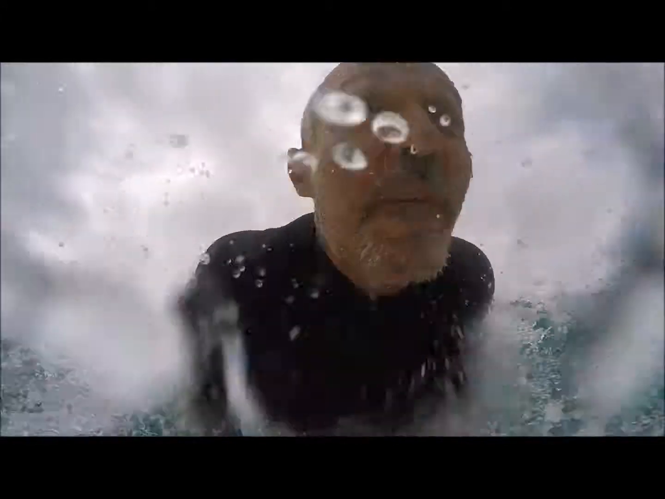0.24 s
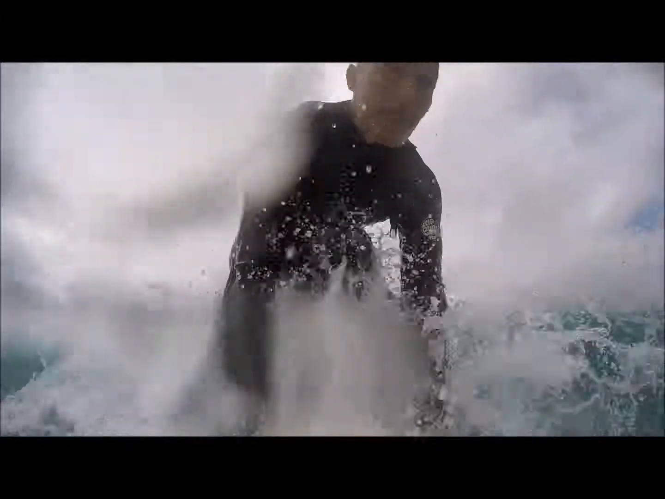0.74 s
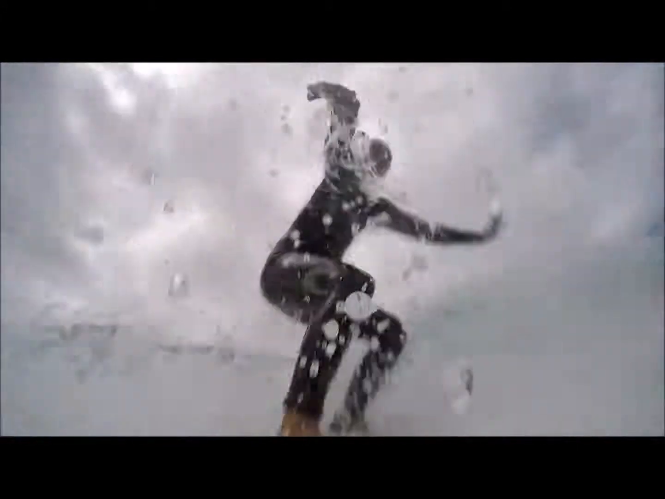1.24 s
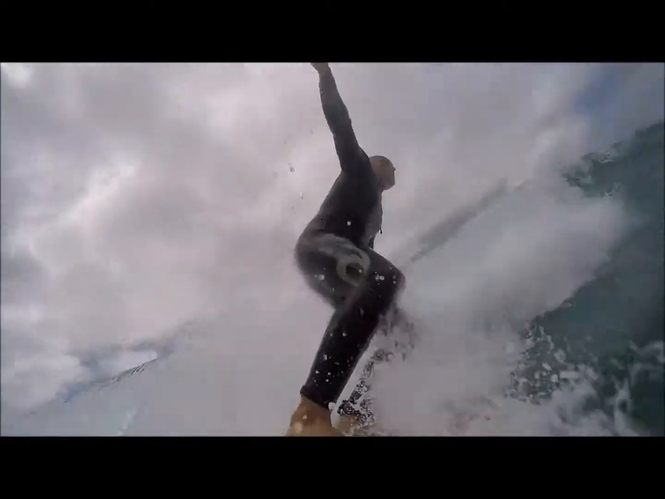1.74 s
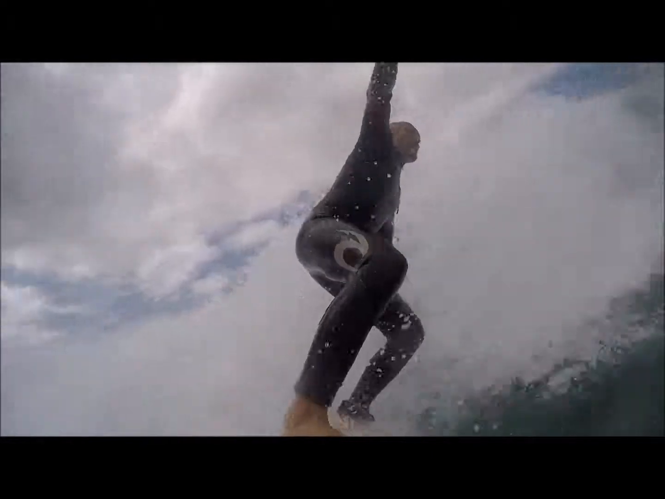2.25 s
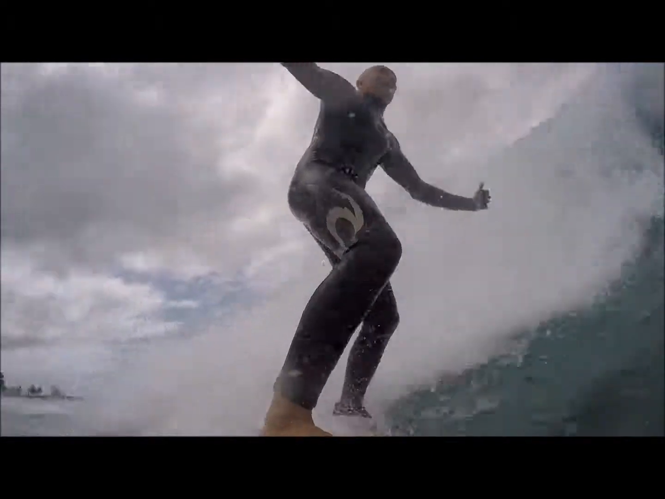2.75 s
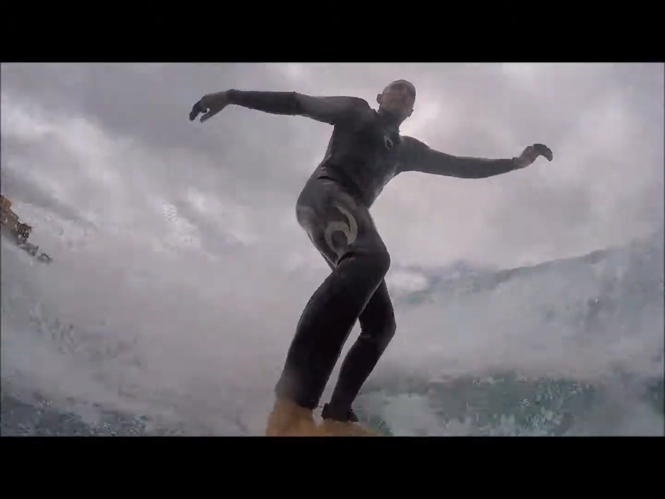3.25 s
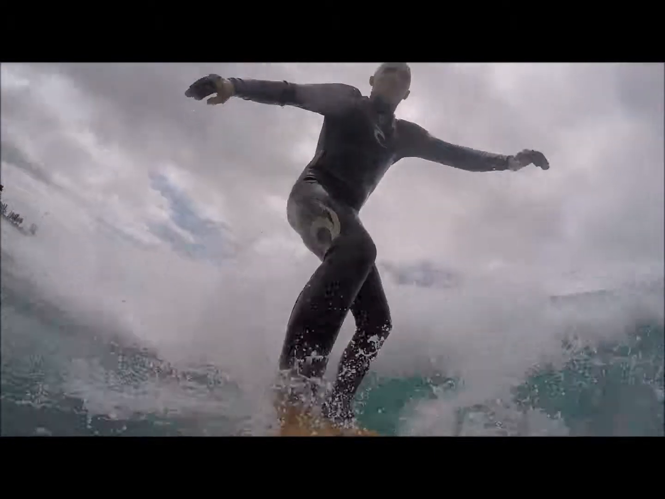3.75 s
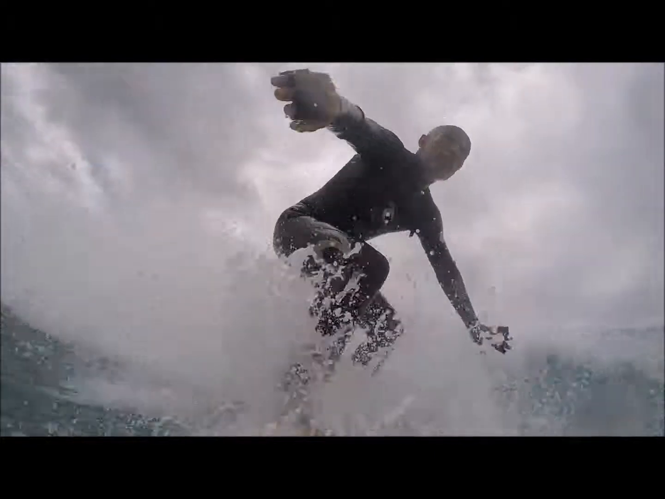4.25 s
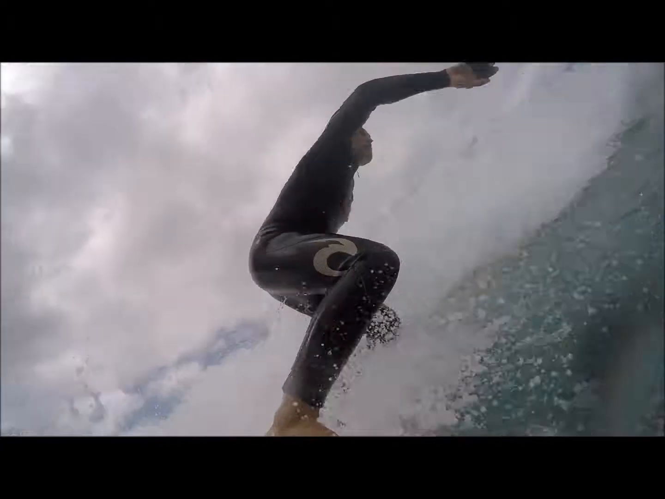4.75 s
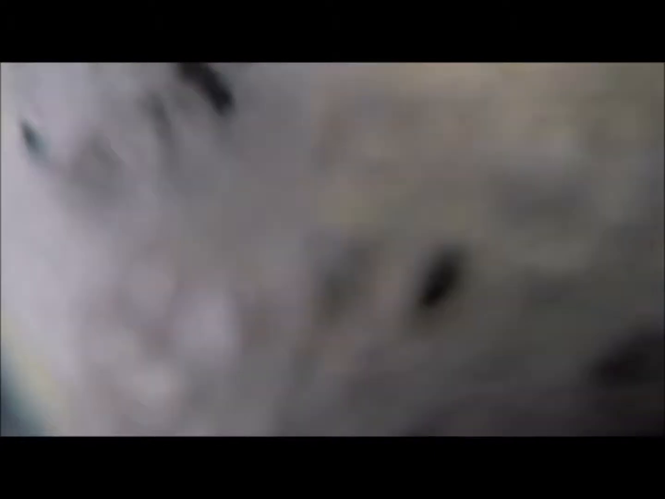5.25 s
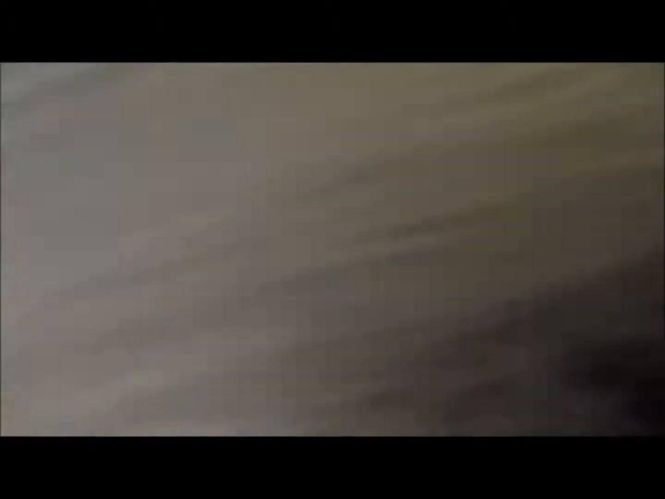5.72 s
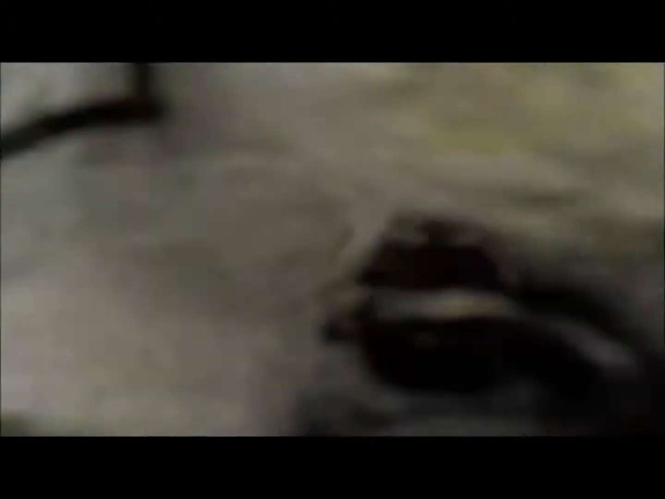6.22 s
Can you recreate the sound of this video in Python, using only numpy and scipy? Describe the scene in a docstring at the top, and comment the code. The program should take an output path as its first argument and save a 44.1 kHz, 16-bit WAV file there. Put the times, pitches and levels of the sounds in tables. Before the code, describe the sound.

A surfboard flaps, thuds and slaps through rushing foam, then its nose dives and the sound turns to muffled underwater churning and crackling bubbles.

```python
"""On the nose of a surfboard in a breaking wave: one microphone in a waterproof housing fixed to the board.
In air the board flaps in a low bending mode and booms on landings; filtered noise and bubbles make the
wash, foam and mist, noise bursts the slaps, gulps and spray, gliding tones the hand's squeak and the chirps.
Then the nose digs in: surges of ringing bubbles and noise churn, crackle and rumble at the case, air pockets
ring against it, and a thin simmer of distant foam fills the lull between."""
import sys
import numpy as np
from scipy import signal
from scipy.fft import rfft, irfft, next_fast_len
from scipy.io import wavfile

SR = 44100
rng = np.random.default_rng(int(sys.argv[2]) if len(sys.argv) > 2 else 0)


def materialize(psi):
    """Save the field psi as 16-bit PCM at rate SR to the path in sys.argv[1].

    A 1-D psi becomes a single channel; in a 2-D psi each row is a channel.
    """
    bounded = np.clip(np.atleast_2d(psi).T, -1, 1)
    quanta = np.round(bounded * 32767).astype(np.int16)
    wavfile.write(sys.argv[1], SR, quanta)


N = 285732
TIME = np.arange(N) / SR

# Bending of the board while it planes: (time [s], level before BEND_DB [dB])
SHUDDER = [(0.0, -14), (0.05, -10.5), (0.13, -33), (0.17, -8), (0.27, -9.5), (0.31, -21), (0.38, -8.5),
           (0.55, -21.5), (0.58, -10), (0.64, -9.5), (0.67, -26.5), (0.91, -6.5), (0.95, -17.5),
           (1.21, -12.5), (1.33, -31), (1.61, -11.5), (1.95, -13), (1.98, -18), (2.27, -12), (2.38, -27),
           (2.43, -12), (2.74, -16), (2.8, -26), (2.95, -10), (2.97, -21), (3.04, -8.5), (3.13, -20.5),
           (3.19, -6.5), (3.34, -31), (3.52, -33), (3.58, -4.5), (3.91, -56), (3.94, -33), (4.04, -6.5),
           (4.13, -11), (4.2, -27), (4.45, -20.5), (4.52, -9.5), (4.56, -24), (4.71, -11.5), (4.8, -36),
           (4.83, -30)]
# Air buffeting the housing: (frequency [Hz], relative density [dB per Hz])
BUFFET = [(18, -1.5), (40, 12), (70, -25)]
BEND_HZ, BEND_SUBMERGED_HZ = 39.08, 58.8   # mean pitch in air, under water
BEND_DB, BEND_SUBMERGED_DB = 1, 4.5   # over its curve; over the heave of the white water
BEND_TOP_HZ = 73.5   # the soft board passes little above this
BEAT_DB = 3.5   # unevenness of the flapping
SHUDDER_FLOOR_DB = -39   # the board never lies quite still while it planes


def board():
    """The nose flaps in one beating bending mode, higher under water; moving air buffets the housing."""
    (level_db,) = in_time(SHUDDER)
    under = submerged()
    hz = BEND_HZ + (BEND_SUBMERGED_HZ - BEND_HZ) * under
    phase = 2 * np.pi * np.cumsum(hz * (1 + 0.0864 * drift(15.9))) / SR
    beating = rms_one(from_db(BEAT_DB * drift(9.3)))
    flap = lowpass(beating * np.sqrt(2) * np.sin(phase), 3, BEND_TOP_HZ)
    buffet = from_db(-6.5) * colour(rng.standard_normal(N), BUFFET)
    planing = together([from_db(level_db + BEND_DB), from_db(SHUDDER_FLOOR_DB)])
    pushed = from_db(BEND_SUBMERGED_DB) * heave()
    return ((1 - under) * planing + under * pushed) * (flap + buffet)


# The hull taking the weight of a landing:
# (time [s], starting level [dB], frequency [Hz], time to fade by 60 dB [s])
THUDS = [(0.132, -21, 277, 0.028), (0.875, -9, 149, 0.025), (0.9, -13, 67, 0.13), (1.103, -5, 110, 0.015),
         (3.178, 3, 85, 0.02), (3.212, -1.5, 58.3, 0.096), (3.571, -4.5, 62, 0.2), (4.066, 1, 70, 0.027),
         (4.891, 0, 32, 0.16), (4.928, -2, 124, 0.027), (4.971, 6.5, 97, 0.033), (6.171, 1, 92, 0.034)]
THUD_RISE_CYCLES = 0.027   # the water cushions the blow


def thuds():
    """A hard landing sets the foam-cored hull booming for a few cycles."""
    out = np.zeros(N)
    for s, db, hz, t60 in THUDS:
        age = np.clip(TIME - s, 0, 1)
        onset = np.tanh(age * hz / THUD_RISE_CYCLES)
        out += from_db(db - 60 * age / t60) * onset * np.sin(2 * np.pi * hz * age)
    return out


# Steady planing, as wash under the hull: (time [s], level before WASH_DB or FOAM_DB [dB])
PLANING = [(0.0, -32), (0.44, -30), (1.45, -37), (1.77, -27), (2.18, -30), (2.43, -30.5), (3.05, -30.5),
           (3.3, -41.5), (3.86, -42.5), (4.53, -33.5), (4.6, -38.5), (4.83, -33.5)]
# The hull presses into the water: (time at the deepest [s], wash level [dB], foam level [dB], length [s])
DIPS = [(0.161, -24.5, -30, 0.18), (0.542, -23, -35, 0.2), (0.686, -23.5, -27.5, 0.055),
        (0.908, -17, -29, 0.1), (1.21, -26, -29, 0.58), (1.59, -29.5, -55, 0.76), (1.868, -30, -23.5, 0.21),
        (2.425, -19, -24, 0.35), (2.546, -14, -26, 0.18), (3.171, -17.5, -29, 0.084),
        (3.585, -16.5, -27, 0.1), (3.647, -23, -26.5, 0.1), (4.023, -16, -27, 0.09),
        (4.073, -15, -21, 0.066), (4.449, -23, -30, 0.16), (4.748, -27, -30.5, 0.24)]
# Spectra of wash and foam: (frequency [Hz], relative density [dB per Hz])
WASH = [(70, 7), (110, -10.5), (170, -8.5), (260, -3.5), (400, -4), (560, -2), (720, -3), (1000, -13.5),
        (1350, -32), (2000, -23)]
FOAM = [(800, -44), (1050, -0.5), (1300, 6), (1600, 4), (1850, 5.5), (2300, -3.5), (2750, -3.5),
        (3150, -12), (4000, -13.5), (5000, -47)]
WASH_DB, FOAM_DB = 1.5, -3.5   # over the planing level
DIP_RISE, DIP_FALL, DIP_DEPTH_DB = 0.53, 0.64, 16   # shares of its length to swell and ebb by this depth


def rush():
    """Planing water gurgles under the hull and breaks into foam; both swell when the hull presses in."""
    (planing_db,) = in_time(PLANING)
    washing, foaming = [from_db(planing_db + WASH_DB)], [from_db(planing_db + FOAM_DB)]
    for s, wash_db, foam_db, length in DIPS:
        depth = swell(s, s, DIP_DEPTH_DB / (DIP_RISE * length), DIP_DEPTH_DB / (DIP_FALL * length))
        washing.append(from_db(wash_db) * depth)
        foaming.append(from_db(foam_db) * depth)
    gurgle = bubbles(450, 220, 1600, cycles=14, spread_db=2.5)
    froth = bubbles(1200, 1000, 4500, cycles=20, spread_db=3)
    wash = water(WASH, gurgle, smooth_db=9, surge_db=1.4, surge_rate=25)
    foam = water(FOAM, froth, smooth_db=4, surge_db=1.3, surge_rate=27)
    return (1 - submerged()) * (together(washing) * wash + together(foaming) * foam)


# Fine mist thrown off the wave: (time [s], level before a lift of 1.5 dB [dB])
MIST_LEVEL = [(0.0, -39.5), (0.45, -45), (0.81, -49), (1.52, -49.5), (1.65, -46.5), (1.94, -43.5),
              (2.35, -41.5), (3.04, -45.5), (3.25, -53.5), (3.9, -55), (4.09, -48), (4.48, -54.5),
              (4.83, -47)]
# Spectra of mist, and of fizz and droplets: (frequency [Hz], relative density [dB per Hz])
MIST = [(3000, 8.5), (4300, 0), (4900, 0.5), (5650, 4), (6600, -7.5), (8100, -3.5), (9500, -16),
        (14000, -13.5), (16000, -33)]
FIZZ = [(2000, -80), (3000, -17), (3800, -3.5), (4700, -14.5), (6000, -11.5), (8000, -16.5), (11000, -22.5),
        (15000, -28)]
DROPLETS_PER_S, DROPLET_DB = 170, -17   # against the mist


def mist():
    """Dense fine grains of spray hiss over noise, with sparser droplets among them."""
    (level_db,) = in_time(MIST_LEVEL)
    fine = water(MIST, grains(6000, spread_db=4), smooth_db=2.5, surge_db=1.1, surge_rate=22)
    droplets = colour(grains(DROPLETS_PER_S, spread_db=5), FIZZ)
    return (1 - submerged()) * from_db(level_db + 1.5) * (fine + from_db(DROPLET_DB) * droplets)


FIZZ_DB, FIZZ_FOLLOWS = -2, 1.243   # bursting grows faster than the churn
CRACKLE_PER_S, CRACKLE_DB = 330, -21   # against the fizz


def tumble():
    """White water shakes the hull and churns round the sunken case; its bubbles burst on the wall."""
    force, bursts = turbulence(), grains(450, spread_db=3.5)
    fizz = water(FIZZ, bursts, smooth_db=0, surge_db=2.0, surge_rate=60)
    crackle = from_db(CRACKLE_DB) * colour(grains(CRACKLE_PER_S, spread_db=5.5), FIZZ)
    bursting = from_db(FIZZ_DB) * force ** FIZZ_FOLLOWS * (fizz + crackle)
    shaking = from_db(-9.5) * heave() * hull_rumble()
    return submerged() * (shaking + force * churn(bursts) + bursting)


# Hull modes under water: (frequency [Hz], width of each of two passes [Hz], level [dB])
HULL = [(102, 116, -0.5), (148, 26, -19), (240, 110, -18)]


def hull_rumble():
    """Eddies drive the low modes of the hull; unit power."""
    eddies, rumble = rng.standard_normal(N), np.zeros(N)
    for hz, width, db in HULL:
        mode = resonate(resonate(eddies, hz, width), hz, width)
        rumble += from_db(db) * rms_one(mode)
    return rms_one(rumble)


# Spectra of the churn and of larger bubbles popping: (frequency [Hz], relative density [dB per Hz])
CHURN = [(200, -2.5), (300, -2), (450, 2), (800, 1.5), (1150, -1.5), (1500, 1.5), (2100, 1), (2700, -2),
         (3600, -13.5), (5000, -7)]
POP = [(900, 3), (2200, 11), (3800, -3.5), (6000, -6), (12000, -15)]
CASE_RING_DB, GURGLE_DB = -13, -8   # against the boiling water
POPS_PER_S, POP_DB = 300, -4.5   # larger bubbles collapsing on the case


def churn(bursts):
    """Water boils with bubbles that ring, gurgle and collapse, and their bursts set the case ringing."""
    boil = bubbles(1000, 900, 4200, cycles=26, spread_db=2.5) + .8 * bursts
    boiling = water(CHURN, boil, smooth_db=8.0, surge_db=4.0, surge_rate=17.4)
    boiling = boiling + from_db(CASE_RING_DB) * case_ring(bursts)
    boiling = boiling + from_db(GURGLE_DB) * gurgles(950, 5000, spread_db=20)
    pops = colour(grains(POPS_PER_S, spread_db=4), POP)
    return from_db(-1) * boiling + from_db(POP_DB) * pops


# Modes of the case: (frequency [Hz], width [Hz], relative gain [dB])
CASE = [(1184, 11, 44), (1620, 170, 4), (1860, 120, 9), (2160, 89, -18), (2220, 56, 18), (2440, 120, 27),
        (2850, 110, -7), (3690, 100, 5), (3970, 30, 3), (5850, 30, 0), (8200, 25, -7)]


def case_ring(x):
    """The plastic case rings in its modes, alternating in sign; unit power."""
    ring = np.zeros(N)
    for k, (hz, width, db) in enumerate(CASE):
        ring += (-1) ** k * from_db(db) * resonate(x, hz, width)
    return rms_one(ring)


GURGLE_CYCLES, GURGLE_RISE = 7.9, 0.058   # cycles to fade by a neper; share its pitch rises meanwhile


def gurgles(low_hz, high_hz, spread_db, count=900):
    """Large bubbles pinch off one by one and ring, rising in pitch; unit power."""
    out, t = np.zeros(N + SR), TIME[:SR // 16]
    for when, size, strength in rng.random((count, 3)):
        at, hz = int(when * N), low_hz * (high_hz / low_hz) ** size
        age = t * hz / GURGLE_CYCLES
        ring = np.exp(-age) * np.sin(2 * np.pi * hz * t * (1 + GURGLE_RISE * age / 2))
        out[at:at + len(t)] += from_db(spread_db * strength ** 2) * ring
    return rms_one(out[:N])


# Surges of white water over the sunken nose:
# (time at full force [s], hold [s], churn force before pockets shield it [dB], heave [dB])
SURGES = [(4.891, 0.019, -15, -9), (4.98, 0.0045, -35, -47), (5.598, 0.055, -20, -14.5),
          (5.734, 0.006, -22.5, -17), (5.798, 0.15, -23.5, -21.5), (6.01, 0.16, -45, -24.5),
          (6.181, 0.21, -20, -20), (6.399, 0.08, -21.5, -18.5)]
HEAVE_RISE_DB_PER_S, HEAVE_FALL_DB_PER_S = 137, 219
LULL_DB, LULL_HEAVE_DB = -60, -46.5   # still water between surges: churn, heave


def heave():
    """Slow push of the white water on the hull."""
    pushes = [from_db(LULL_HEAVE_DB)]
    for s, hold, _, db in SURGES:
        pushes.append(from_db(db) * swell(s, s + hold, HEAVE_RISE_DB_PER_S, HEAVE_FALL_DB_PER_S))
    return together(pushes)


SURGE_RISE_DB_PER_S, CHURN_FALL_DB_PER_S = 453, 275
FIRST_EDDIES_DB, EDDIES_RISE_DB_PER_S = 0, 121   # against the surge they announce
SPUTTER_DB, SPUTTER_HZ = 6, 70   # the first eddies come in fits and starts


def turbulence():
    """Sputtering eddies announce each surge; it breaks, holds and drains; air pockets keep it off the case."""
    gains = [from_db(LULL_DB)]
    sputter = rms_one(from_db(SPUTTER_DB * np.tanh(drift(SPUTTER_HZ))))
    for s, hold, db, _ in SURGES:
        surge = swell(s, s + hold, SURGE_RISE_DB_PER_S, CHURN_FALL_DB_PER_S)
        eddies = sputter * swell(s, s, EDDIES_RISE_DB_PER_S, CHURN_FALL_DB_PER_S)
        gains.append(from_db(db) * surge)
        gains.append(from_db(db + FIRST_EDDIES_DB) * eddies)
    shield_db = sum(db * held(s, length) for s, length, db, _ in POCKETS)
    return together(gains) * from_db(-shield_db)


# Water slapping the hull: (time [s], level [dB], length [s], centre [Hz])
SLAPS = [(0.130, -11.5, 0.0085, 320), (0.868, -15, 0.02, 790), (1.105, -16, 0.016, 2470),
         (1.240, -22, 0.018, 1080), (2.243, -19, 0.0091, 1570), (2.528, -9.5, 0.0079, 1580),
         (2.564, -15, 0.0025, 1700), (3.165, -10.5, 0.028, 523), (3.173, -22, 0.03, 790),
         (3.287, -31, 0.012, 1430), (3.558, -22, 0.015, 580), (3.564, -11.5, 0.01, 694),
         (4.005, -15.5, 0.0044, 627), (4.070, -8, 0.0059, 560), (4.075, -35, 0.0046, 1390),
         (4.097, -21.5, 0.0068, 1360), (4.116, -16, 0.003, 450), (4.772, -22, 0.01, 1470),
         (4.885, -16.5, 0.005, 1270), (4.892, -9, 0.0084, 526), (4.900, -11, 0.007, 1790),
         (4.914, -8, 0.0017, 1760), (4.930, -21, 0.0092, 760), (4.969, -6, 0.0079, 288),
         (4.970, -5, 0.003, 1310), (5.545, -24, 0.0076, 900), (5.590, -32, 0.013, 620),
         (5.728, -32, 0.011, 1010), (6.173, -24, 0.0081, 720), (6.418, -23, 0.0044, 1110)]
# Gulps of air trapped under the board: (time [s], level [dB], length [s], centre [Hz])
GULPS = [(0.465, -23, 0.008, 690), (0.488, -27, 0.0071, 466), (0.497, -16.5, 0.011, 610),
         (0.580, -29, 0.037, 606), (0.652, -23.5, 0.0083, 420), (0.659, -27.5, 0.018, 730),
         (0.677, -29, 0.015, 694), (0.822, -25.5, 0.018, 1180), (0.876, -24.5, 0.0058, 1270),
         (0.935, -25.5, 0.037, 1300), (0.972, -22.5, 0.0041, 352), (1.199, -17.5, 0.0045, 1230),
         (1.228, -25, 0.013, 1250), (1.250, -19.5, 0.012, 740), (1.315, -26, 0.017, 815),
         (1.33, -18.5, 0.0054, 390)]
# Spray and drops striking the housing: (time [s], level [dB], length, at least 1 ms is played [s], centre [Hz])
SPRAY = [(0.299, -34, 0.002, 6500), (0.305, -20.5, 0.01, 1990), (0.307, -23.5, 0.011, 6100),
         (0.321, -27, 0.0039, 2200), (0.328, -27, 0.0053, 3000), (0.751, -27, 0.0073, 2600),
         (0.753, -31.5, 0.0041, 7800), (0.927, -27.5, 0.0023, 5040), (1.038, -30, 0.0047, 5660),
         (1.104, -16, 0.0076, 4000), (1.113, -20.5, 0.0059, 6440), (1.121, -31, 0.0062, 5500),
         (1.132, -32, 0.0094, 5000), (1.141, -35, 0.0038, 5000), (1.152, -32, 0.0051, 3300),
         (1.192, -33, 0.002, 2800), (1.214, -21, 0.0067, 2950), (1.222, -40, 0.016, 6500),
         (1.2415, -15, 0.0055, 2370), (1.242, -23, 0.004, 5660), (1.252, -14, 0.0026, 1980),
         (1.2525, -15.5, 0.0025, 4960), (1.312, -32, 0.0019, 2900), (2.308, -18, 0.00083, 5900),
         (2.316, -18.5, 0.0014, 4350), (2.530, -23.5, 0.0016, 5950), (2.700, -27, 0.0015, 11700),
         (2.924, -25, 0.00084, 4100), (3.176, -26.5, 0.0045, 2400), (3.190, -30.5, 0.0046, 6500),
         (3.581, -13, 0.0036, 1880), (3.582, -15.5, 0.00088, 3700), (3.583, -22, 0.001, 8200),
         (4.075, -32, 0.004, 2600), (4.107, -23, 0.00084, 10800), (4.118, -37, 0.004, 6500),
         (4.844, -28, 0.0076, 5500), (4.846, -21.5, 0.0044, 2680), (4.852, -26, 0.003, 4200),
         (4.876, -23, 0.0017, 3180), (4.941, -25, 0.0058, 4200), (4.969, -8.5, 0.0032, 3320),
         (5.351, -48, 0.0015, 7000), (5.404, -50, 0.0017, 4000), (5.462, -24.5, 0.0025, 2650),
         (5.469, -30, 0.0011, 9900), (5.496, -25.5, 0.0046, 2960), (5.514, -25, 0.0034, 3200),
         (5.525, -34, 0.002, 3200), (5.545, -27, 0.0024, 2250), (5.782, -11, 0.00094, 3930),
         (5.847, -14.5, 0.0058, 2680), (5.872, -15, 0.0032, 2870), (5.891, -25, 0.0046, 3600),
         (5.909, -17.5, 0.0032, 2380), (5.940, -28, 0.0033, 6450), (5.950, -16, 0.00073, 6600),
         (5.995, -14, 0.00091, 5370), (5.996, -17, 0.01, 2330), (6.149, -26, 0.0073, 2700),
         (6.174, -5.5, 0.0024, 2490), (6.311, -17.5, 0.0093, 2600), (6.331, -19, 0.003, 3500),
         (6.350, -21, 0.015, 3070)]
SPATTER_DB, SPATTER_HZ = 4, 160   # a splash breaks up into lumps


def splashes():
    """Dull slaps and gulps at the hull, and ragged spray on the housing."""
    heavy = lowpass(rng.standard_normal(N), 2, 2200)
    lumps = from_db(SPATTER_DB * np.tanh(drift(SPATTER_HZ)))
    slaps = impacts(SLAPS, heavy * lumps, width=0.37, tail_s=0.0068)
    gulps = impacts(GULPS, heavy, width=0.099, tail_s=0.0042)
    drops = rms_one(rng.standard_normal(N) + bubbles(9000, 1500, 14000, cycles=12, spread_db=2))
    spray = impacts(SPRAY, drops * lumps, width=0.62, tail_s=0.0096)
    return slaps + gulps + spray


CONTACT_DB, CONTACT_S = 6.5, 0.00056   # the first touch of a splash is its hardest


def impacts(rows, force, width, tail_s):
    """Water strikes, presses for its length, then runs off; each splash sounds round its own centre."""
    out, t = np.zeros(N + SR), TIME[:SR // 5]
    for s, db, length, hz in rows:
        at, length = int(s * SR), max(length, .001)
        run_off = from_db(-16) * np.exp(-t / (tail_s + length / 2))
        press = np.exp(-(t / length) ** 4) + run_off
        press = press * from_db(CONTACT_DB * np.exp(-t / CONTACT_S))
        breadth = width * min(length / 0.0065, 1)   # short splashes ring more purely than long ones
        burst = resonate(np.roll(force, -at)[:len(t)] * press, hz, hz * breadth)
        out[at:at + len(t)] += from_db(db) * burst / np.sqrt(np.sum(burst ** 2) / (length * SR))
    return out[:N]


# Single drops and bubbles ringing for an instant:
# (time [s], starting level [dB], frequency [Hz], time to fade by 60 dB [s])
PLINKS = [(0.312, -7.5, 6060, 0.014), (0.322, -19, 5760, 0.01), (0.332, -11.5, 1660, 0.018),
          (0.349, -10, 1800, 0.014), (0.349, -11, 2980, 0.011), (0.926, -17.5, 7000, 0.006),
          (1.039, -17, 7500, 0.008), (1.215, -12, 1940, 0.012), (2.308, -7, 6800, 0.0047),
          (2.316, -7, 5260, 0.0058), (2.333, -23, 4150, 0.018), (2.701, -17, 5130, 0.0065),
          (2.924, -12.5, 2540, 0.012), (3.199, -15, 2500, 0.012), (4.097, -19, 3850, 0.011),
          (4.108, -24, 3670, 0.01), (4.914, -7, 1940, 0.037), (5.768, -9, 2350, 0.012),
          (5.814, -9, 2350, 0.013), (5.834, -13, 2420, 0.012), (5.845, 1.5, 2250, 0.013),
          (6.28, -17, 1800, 0.04), (6.315, -10, 1660, 0.034)]


def plinks():
    """A drop traps a small bubble, which rings and dies within milliseconds."""
    out, t = np.zeros(N + SR), TIME[:SR // 16]
    for s, db, hz, t60 in PLINKS:
        at = int(s * SR)
        ring = np.tanh(t * hz) * np.sin(2 * np.pi * hz * t)
        out[at:at + len(t)] += from_db(db - 60 * t / t60) * ring
    return out[:N]


# Air pockets ringing against the case: (time [s], length [s], cut in the churn [dB],
# resonances as (frequency [Hz], width, widened by half for each of two passes [Hz], level [dB]))
POCKETS = [(5.806, 0.035, 6.8, [(2300, 450, -19.5), (3650, 200, -23.5), (4930, 130, -33)]),
           (5.923, 0.028, 12, [(2180, 400, -19.5), (2720, 150, -37), (3760, 110, -23)]),
           (6.037, 0.051, 15, [(1560, 490, -30.5)]), (6.09, 0.074, 14.4, [(1400, 490, -36.5),
           (3770, 51, -60), (5850, 50, -52)]), (6.281, 0.03, 3.6, [(1130, 32, -22.5), (1620, 66, -25),
           (1975, 48, -18.5), (2310, 260, -22.5), (5850, 43, -28.5), (8500, 40, -37)])]
POCKET_THROB_DB, POCKET_THROB_HZ, POCKET_WAVER = 5, 130, 0.018   # shaken by the churn; share its pitch wavers


def pockets():
    """Air caught on the case rings at pitches of its own, throbbing and wavering as it deforms."""
    out, samples = np.zeros(N), np.arange(N)
    deformed = samples + np.cumsum(POCKET_WAVER * drift(POCKET_THROB_HZ))
    for s, length, _, resonances in POCKETS:
        stay = held(s, length)
        throb = from_db(POCKET_THROB_DB * np.tanh(drift(POCKET_THROB_HZ)))
        for hz, width, db in resonances:
            ring = resonate(resonate(rng.standard_normal(N), hz, 1.5 * width), hz, 1.5 * width)
            ring = stay * throb * np.interp(deformed, samples, ring)
            out += from_db(db) * ring / np.sqrt(np.sum(ring ** 2) / np.sum(stay ** 2))
    return out


# Wet hand slipping on the deck: (time [s], mean frequency [Hz], mean level [dB])
SQUEAK = [(0.51, 680, -45), (0.522, 610, -22), (0.53, 520, -15), (0.54, 470, -15), (0.55, 495, -10.5),
          (0.561, 510, -8.5), (0.569, 560, -13), (0.577, 630, -40)]
SQUEAK_OCTAVE_DB = -23   # its overtone


def squeak():
    """Skin sticks and slips on the wet deck: an unsteady tone that sags and rises, with a weak overtone."""
    hz, level_db = in_time(SQUEAK)
    phase = 2 * np.pi * np.cumsum(hz * (1 + 0.04 * drift(154))) / SR
    sliding = (TIME > SQUEAK[0][0]) & (TIME < SQUEAK[-1][0])
    tone = np.sin(phase) + from_db(SQUEAK_OCTAVE_DB) * np.sin(2 * phase)
    return sliding * from_db(level_db + 1.4 * drift(120)) * np.sqrt(2) * tone


# Water films chirping as they drain:
# (time [s], length [s], start [Hz], end [Hz], level before the flutter [dB])
CHIRPS = [(2.859, 0.018, 4400, 5900, -27.5), (2.860, 0.016, 2900, 3500, -34),
          (5.148, 0.022, 4950, 5600, -53), (5.184, 0.016, 4000, 4200, -52), (5.218, 0.058, 3500, 2500, -46),
          (5.222, 0.06, 773, 600, -45), (5.262, 0.028, 2500, 4200, -42), (5.284, 0.016, 4200, 5900, -46),
          (6.035, 0.017, 10800, 9200, -40)]


def chirps():
    """A shrinking film of water whistles in a short, rough glide."""
    out, flutter, waver = np.zeros(N), drift(250), drift(500)
    for s, length, start_hz, end_hz, db in CHIRPS:
        along = np.clip((TIME - s) / length, 0, 1)
        hz = (start_hz + (end_hz - start_hz) * along) * (1 + .02 * waver)
        whistle = np.sqrt(2) * np.sin(2 * np.pi * np.cumsum(hz) / SR)
        out += from_db(db) * np.sin(np.pi * along) * (.8 + .55 * flutter) * whistle
    return out


# Distant foam heard through still water: (frequency [Hz], relative density [dB per Hz])
LULL = [(180, -33), (300, 1.5), (723, -6.5), (970, -10.5), (1560, 1), (4330, -14.5), (4750, -9),
        (5130, -20), (12000, -29), (15600, -54), (22000, -120)]
STILL_WATER_DB = -52.5


def lull():
    """A thin simmer of distant foam reaches the sunken case, bare between the surges."""
    return submerged() * from_db(STILL_WATER_DB) * colour(grains(3000, spread_db=3.5), LULL)


def hiss():
    """The microphone's own noise."""
    return from_db(-69.5) * rng.standard_normal(N)


# Peaks and hollows in what the housing lets through in air:
# (frequency [Hz], width, broader for hollows and narrower for peaks [Hz], level [dB])
HOUSING = [(2250, 150, -0.5), (2770, 120, -11.5), (2990, 150, 1), (3600, 110, 0), (5600, 350, 2.5),
           (6290, 350, -3.5), (6600, 520, 5), (7700, 500, -6), (9700, 380, 5.5)]
# The treble dips briefly: (time [s], length [s], loss [dB])
DULL_MOMENTS = [(1.283, 0.011, 20), (2.427, 0.015, 13), (2.623, 0.009, 31)]
DULL_ABOVE_HZ = 2600


def through_housing(x):
    """The housing colours the water outside; now and then the treble dips briefly."""
    for hz, width, db in HOUSING:
        x = x + (from_db(db) - 1) * resonate(x, hz, width * from_db(-db / 2))
    dull = lowpass(x, 4, DULL_ABOVE_HZ)
    clear = from_db(-sum(db * held(s, length) for s, length, db in DULL_MOMENTS))
    return clear * x + (1 - clear) * dull


def submerged():
    """Share of the housing that is under water, from the start to the end of the nose dive."""
    return np.interp(TIME, (4.835, 4.955), [0, 1])


def water(spectrum, bubbling, smooth_db, surge_db, surge_rate):
    """Near bubbles over the smooth noise of far ones, coming in surges; unit power."""
    sound = colour(bubbling + from_db(smooth_db) * rng.standard_normal(N), spectrum)
    return rms_one(sound * from_db(surge_db * drift(surge_rate)))


def bubbles(per_s, low_hz, high_hz, cycles, spread_db, count=28):
    """Bubbles of many sizes, each ringing for a few cycles; unit power."""
    clicks, dealt = grains(per_s, spread_db), rng.integers(0, count, N)
    out = np.zeros(N)
    for k, hz in enumerate(np.geomspace(low_hz, high_hz, count)):
        out += resonate(clicks * (dealt == k), hz, hz / cycles)
    return rms_one(out)


def grains(per_s, spread_db):
    """Random clicks, many small and few large; unit power."""
    sizes_db = spread_db * np.minimum(rng.exponential(1, N), 4)
    sizes = from_db(sizes_db) * rng.choice([-1, 1], N)
    return rms_one(sizes * (rng.random(N) < per_s / SR))


def swell(start, end, rise_db_per_s, fall_db_per_s):
    """Gain that builds up to the start, holds, and ebbs after the end."""
    before, after = np.maximum(start - TIME, 0), np.maximum(TIME - end, 0)
    return from_db(-rise_db_per_s * before - fall_db_per_s * after)


def held(s, length):
    """Gain of something that arrives at s, stays for its length and leaves."""
    return np.exp(-(2 * (TIME - s) / length - 1) ** 4)


def together(gains):
    """Unrelated sounds add in power."""
    return np.sqrt(sum(gain ** 2 for gain in gains))


def drift(rate):
    """Slow chance with spread 1: noise through two equal poles at rate [Hz], made at every 40th sample."""
    r = np.exp(-80 * np.pi * rate / SR)
    slow = signal.lfilter([1], [1, -2 * r, r * r], rng.standard_normal(N // 40 + 2002))[2000:]
    return np.interp(np.arange(N) / 40, np.arange(len(slow)), rms_one(slow))


def resonate(x, hz, width_hz):
    """A resonance with gain 1 on top."""
    hz = min(hz, SR / 3)
    return signal.lfilter(*signal.iirpeak(hz, max(hz / width_hz, .5), fs=SR), x + 1e-18)


def lowpass(x, order, hz):
    """Lets through what lies below hz."""
    return signal.sosfilt(signal.butter(order, hz, fs=SR, output="sos"), x)


def colour(x, spectrum):
    """Causal filter with the given spectrum, falling off beyond its ends; unit power."""
    size = next_fast_len(N + SR // 2, True) // 2 * 2
    hz = np.arange(size // 2 + 1) * SR / size + 1
    knots, db = np.transpose(spectrum)
    octaves_outside = np.abs(np.log2(hz / np.clip(hz, knots[0], knots[-1])))
    db = np.interp(np.log(hz), np.log(knots), db) - 20 * np.minimum(octaves_outside, 2)
    cepstrum = irfft(db * np.log(10) / 20)
    response = np.exp(rfft(2 * cepstrum[:size // 2], size))   # minimum phase
    return rms_one(irfft(rfft(x, size) * response)[:N])


def in_time(rows):
    """Each column of a curve at every sample."""
    s, *columns = np.transpose(rows)
    return [np.interp(TIME, s, c) for c in columns]


def from_db(db):
    """Decibels to gain."""
    return 10 ** (np.asarray(db) / 20)


def rms_one(x):
    """Scale to unit power."""
    return x / np.sqrt(np.mean(x ** 2) + 1e-20)


def scene():
    """Everything reaches one microphone; the housing's colouring is applied to the rush and mist."""
    riding = board() + thuds() + through_housing(rush() + mist())
    under_water = tumble() + pockets() + lull()
    close_by = splashes() + plinks() + squeak() + chirps()
    return (riding + under_water + close_by + hiss())[None]


def record(dry):
    """The hardest blows overload the microphone; the top is cut at 15.5 kHz."""
    rounded = dry / (1 + np.abs(dry / .97) ** 6) ** (1 / 6)
    return signal.sosfilt(signal.cheby1(12, .3, 15500, fs=SR, output="sos"), rounded)


dry = scene()
out = record(dry)
materialize(out)
```